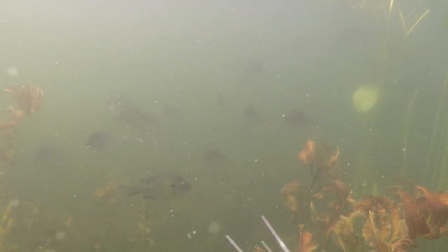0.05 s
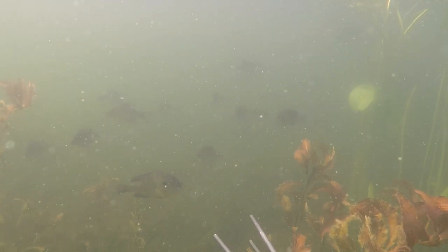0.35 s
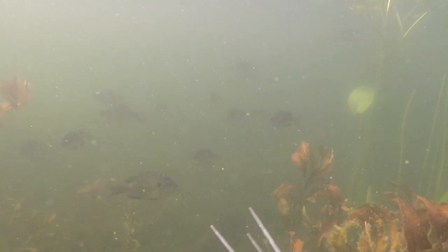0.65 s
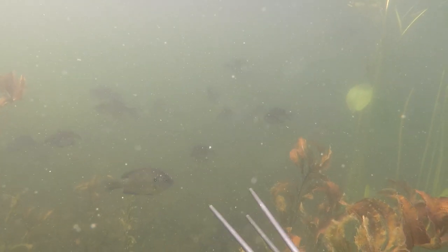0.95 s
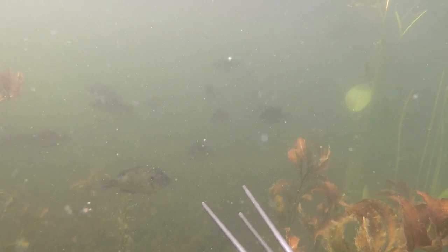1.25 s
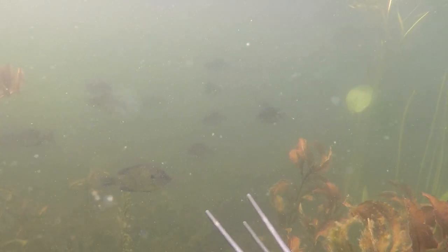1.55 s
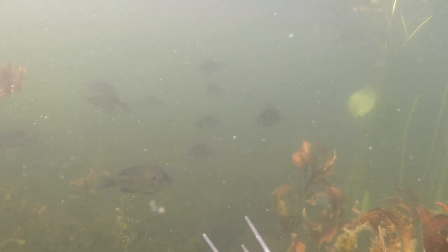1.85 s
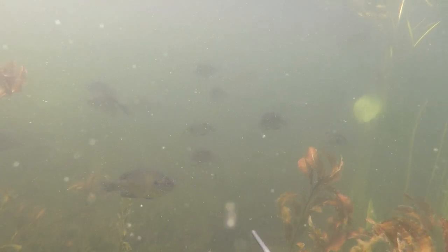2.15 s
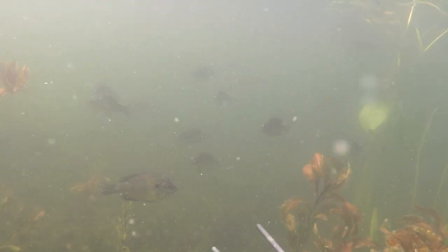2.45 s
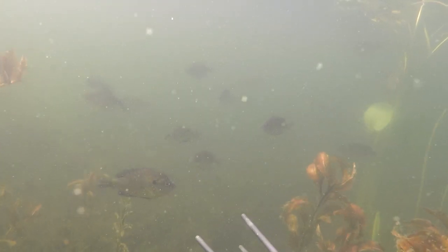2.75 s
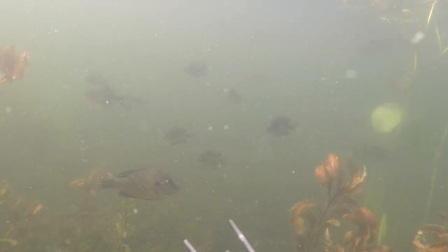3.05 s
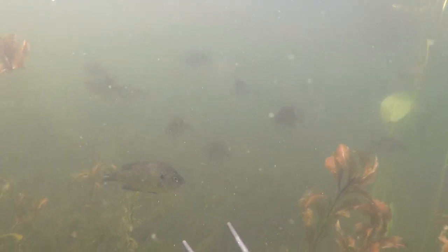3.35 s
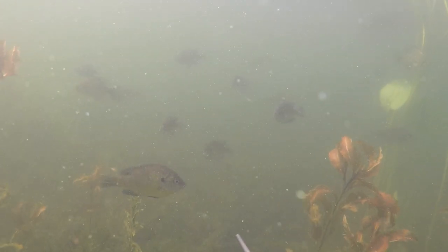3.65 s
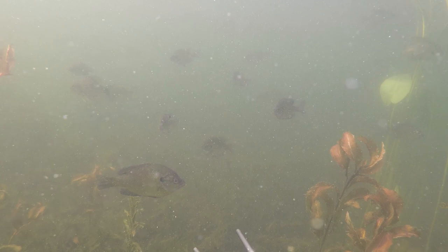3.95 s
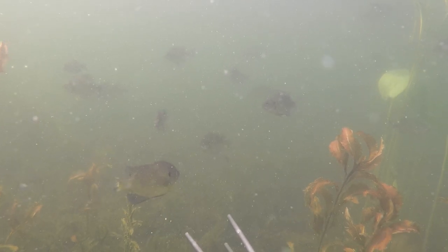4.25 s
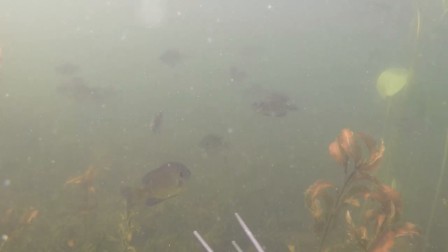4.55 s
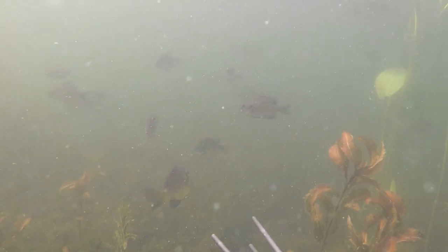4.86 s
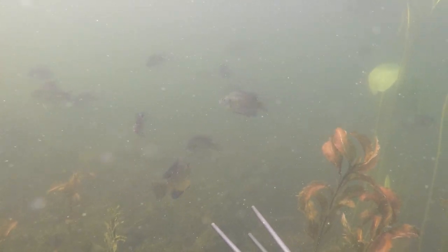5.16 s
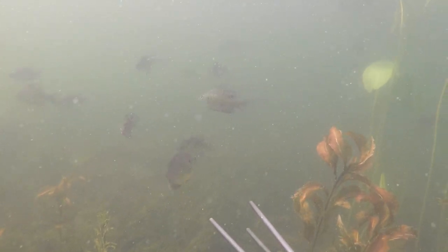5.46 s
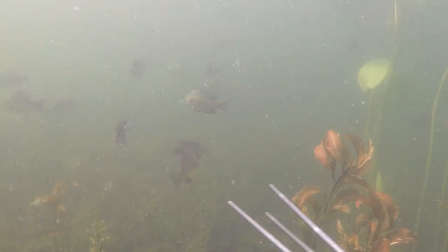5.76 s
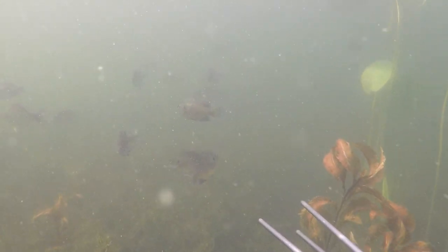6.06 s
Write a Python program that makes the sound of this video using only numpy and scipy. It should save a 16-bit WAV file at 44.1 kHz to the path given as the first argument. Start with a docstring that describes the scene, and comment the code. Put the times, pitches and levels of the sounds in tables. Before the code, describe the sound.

Muffled underwater bubbling in a pond swells into a gurgling gush, ends in one loud glug, then thins to stray plips.

```python
"""A gush of air gurgles up through a pond, past a camera held under the surface in a waterproof case.
Large pockets thump the case and small bubbles ring; the gush thins into single bubbles and ends in
one loud glug, then only stray plips. Specks tick against the case and water rumbles on it, over a
faint hiss. Its walls colour the sound and reach the two microphones differently."""
import sys
import numpy as np
from scipy import signal
from scipy.fft import rfft, irfft, next_fast_len
from scipy.io import wavfile
from scipy.ndimage import uniform_filter1d, minimum_filter1d

SR = 44100
rng = np.random.default_rng(int(sys.argv[2]) if len(sys.argv) > 2 else 0)


def master(y):
    """Save y as 16-bit WAV."""
    cut = np.clip(np.atleast_2d(y).T, -1, 1)
    pcm = np.round(cut * 32767)  # scale
    wavfile.write(sys.argv[1], SR, pcm.astype(np.int16))


N = 278271
TIME = np.arange(N) / SR
FFT_SIZE = 2 * next_fast_len(N // 2 + 8000)
BIN_HZ = np.fft.rfftfreq(FFT_SIZE, 1 / SR)
STRAY_DB = -42.5  # a few small bubbles are always about


def gush(level_db=-1, throb_db=1.26):
    """Air tears into many pockets a second, each a push on the case."""
    # the weight of large bubbles in the gush: (frequency [Hz], gain [dB])
    tone = [(100, -2), (150, -3), (190, 8.5), (250, 9), (330, 9.5), (420, -2), (600, 2), (1000, -8),
            (1900, -3), (2800, -11), (4500, -12)]
    churn = colour(patter(per_s=1600, spread_db=0.76), case_db() + over_bins(tone))
    throb = gain_of(throb_db * wander(rate_hz=26))
    return unit_rms(churn * throb) * gain_of(level_db) * airflow()


def airflow(attack_s=0.07, release_s=0.21):
    """Strength of the escaping air: every surge has an attack, a steady slope and a release."""
    # surges of air: (start [s], length [s], level [dB], fade [dB/s])
    surges = [(1.39, 1.18, -16.5, 12.5), (2.908, 0.9, -31, 4.5), (3.148, 0.047, -35.5, -4),
              (5.375, 0.06, -42, 17), (6.035, 0.32, -49.5, 14), (6.256, .06, -42, 4)]
    out = np.zeros(N)
    for start, length, db, fade_db_per_s in surges:
        t = np.maximum(TIME - start, 0)
        attack = np.minimum(t / attack_s, 1)
        release = np.exp(-np.maximum(t - length, 0) / release_s)
        out += attack * release * gain_of(db - fade_db_per_s * t)
    return out


def glugs(level_db=-1, wall_hz=312, wall_db=-10):
    """Large bubbles swell over a few cycles and shake a low mode of the case with them."""
    # big pockets of air that thump the case: (time [s], level [dB], pitch [Hz], t60 [s])
    pockets = [(0.569, -26.5, 195, 0.081), (0.634, -20, 240, 0.042), (0.664, -16.5, 217.6, 0.045),
               (1.425, -7, 218, 0.074), (1.4482, 6, 230.4, 0.043), (1.533, -20.5, 225, 0.053),
               (1.561, -0.5, 205, 0.03), (1.584, -10.5, 226, 0.045), (1.605, -9, 230, 0.02),
               (1.683, -12.5, 216, .05), (1.744, -18.5, 244, 0.091), (1.787, -13.5, 233, 0.086),
               (1.886, -16, 213, .05), (2.058, -10.5, 236, 0.055), (2.309, -24, 210, 0.037),
               (3.243, -11.5, 210, 0.054), (3.308, -33, 179, 0.15), (3.7871, -15.5, 190, 0.14),
               (3.858, -12, 200, 0.03), (5.434, -27.5, 209, 0.073), (5.586, -33.5, 187, 0.072)]
    # water shoved against the case by big pockets: (time [s], level [dB], pitch [Hz], t60 [s])
    shoves = [(1.562, -25.5, 50.2, 0.15), (3.258, -20, 23.3, 0.38), (3.785, -28.5, 35, 0.19),
              (3.917, -18.5, 55.3, 0.028)]
    out = np.zeros(N)
    wall = gain_of(wall_db) * ring(wall_hz, t60=0.1, rise_s=0.0026, sag=0.19, settle_s=0.0042)
    for s, db, hz, t60 in pockets:
        body = ring(hz, t60, rise_s=0.009, sag=0.12, settle_s=0.031)
        add(out, s, gain_of(db + level_db) * (body + wall))
    for s, db, hz, t60 in shoves:
        add(out, s, gain_of(db) * ring(hz, t60, rise_s=0.01, sag=0.13, settle_s=0.037))
    return out


def last_glug(at_s=3.9152):
    """The gush's last pocket strikes the case: high modes speak at once, low ones swell into a plop."""
    # modes of the struck case: (pitch [Hz], level [dB], t60 [s], rise [s])
    modes = [(202.5, -7, 0.07, 0.023), (231.5, 4.5, 0.027, 0.033), (314.6, 1, 0.034, 0.025),
             (390, -8.5, 0.084, 0.0027), (585, -1.5, 0.0094, 0.0022), (725, -22, 0.035, 0.0052),
             (1296, -28, 0.029, .003), (1960, -28, 0.019, 0.0055), (2260, -40, 0.023, .004),
             (2800, -54, .018, .004)]
    out = np.zeros(N)
    for hz, db, t60, rise_s in modes:
        add(out, at_s, gain_of(db) * ring(hz, t60, rise_s))
    return out


def bubbles(level_db=0.5, click_db=-4, shard_db=-14, shard_s=0.018, shard_hz=860, shard_span_hz=380):
    """Each bubble clicks the case as it pinches off, then rings; in a crowd its neighbours jostle it."""
    # bubbles that stand out of the swarm: (time [s], level [dB], pitch [Hz], t60 [s])
    plips = [(.226, -23.5, 744, 0.024), (0.4351, -23.5, 717, 0.039), (0.537, -23.5, 956, 0.047),
             (.568, -20.5, 758, 0.06), (.579, -23.5, 950, 0.0203), (.745, -29.5, 696, .035),
             (.83, -28.5, 670, 0.032), (0.972, -19, 840, 0.018), (0.979, -26.5, 1180, 0.014),
             (1.146, -24, 1127, 0.025), (1.15, -29, 903, 0.06), (1.204, -29, 710, 0.036),
             (1.279, -42, 790, 0.023), (1.359, -27, 735, 0.031), (1.37, -21, 763, 0.11),
             (1.404, -16, 690, 0.041), (1.4442, -7.5, 532, 0.049), (1.503, -15.5, 1023, 0.09),
             (1.503, -20, 566, .04), (1.556, -14, 630, 0.045), (1.557, -17.5, 1026, .05),
             (1.659, -25, 564, 0.033), (1.66, -15.5, 787, 0.089), (1.7064, -9, 737, 0.11),
             (1.773, -17.5, 468, 0.11), (1.786, -16, 805, 0.043), (1.788, -22.5, 1040, 0.033),
             (1.8265, -14.5, 676, 0.023), (1.843, -19, 782, 0.22), (1.866, -19, 923, .05),
             (1.872, -11, 770, 0.037), (1.877, -20.5, 1247, 0.058), (1.883, -10, 950, 0.023),
             (1.919, -24, 1160, .05), (2.044, -25.5, 1150, 0.15), (2.094, -24, 876, 0.16),
             (2.175, -22.5, 777, 0.051), (2.283, -23, 990, 0.075), (2.296, -15, 905, 0.064),
             (2.3425, -14, 1077, 0.11), (2.3442, -3.5, 927, 0.042), (2.356, -10, 825, 0.06),
             (2.3726, -15, 960, 0.066), (2.413, -14.5, 900, 0.084), (2.463, -27, 1114, 0.15),
             (2.478, -17.5, 887, 0.033), (2.488, -21, 1197, 0.037), (2.535, -32, 1464, 0.062),
             (2.555, -15.5, 878, 0.043), (2.612, -11, 990, 0.045), (2.625, -26, 1504, 0.015),
             (2.6208, -8.5, 968, 0.046), (2.6593, -15.5, 1122, 0.096), (2.658, -22, 958, 0.089),
             (2.677, -15, 934, 0.14), (2.687, -24.5, 1130, .06), (2.719, -34, 1170, 0.046),
             (2.714, -17, 915, 0.094), (2.756, -15.5, 950, 0.057), (2.771, -26, 1202, 0.13),
             (2.791, -13.5, 944, 0.033), (2.792, -24.5, 1200, 0.041), (2.8305, -24.5, 1260, 0.024),
             (2.8465, -20, 1133, 0.042), (2.867, -17, 970, 0.06), (2.867, -23, 1140, .05),
             (2.918, -34, 1274, 0.046), (3.068, -15, 900, 0.033), (3.156, -2.5, 1180, 0.05),
             (3.157, -9, 985, 0.035), (3.1622, -7, 1223, 0.055), (3.174, -14.5, 716, 0.014),
             (3.22, -28, 927, 0.1), (3.248, -29, 1390, .04), (3.258, -22, 1030, 0.045),
             (3.259, -15, 1183, 0.073), (3.331, -25, 1270, 0.051), (3.43, -27, 1320, 0.015),
             (5.061, -42.5, 1860, 0.047), (5.064, -23, 800, 0.13), (5.07, -37, 920, 0.037),
             (5.437, -44.5, 1420, 0.12), (5.45, -24, 1025, 0.016), (5.453, -22.5, 860, 0.11),
             (5.474, -23, 614, 0.012), (5.609, -29.5, 1470, 0.024), (5.6679, -13.5, 738, 0.037),
             (5.881, -21, 905, 0.017), (6.058, -20.5, 1030, 0.026), (6.06, -20, 900, 0.061),
             (6.06, -36, 1720, 0.023), (6.113, -19.5, 680, 0.0094)]
    tones, clicks = np.zeros(N), np.zeros(N)
    crowd = crowding() + gain_of(STRAY_DB)
    crowd = np.sqrt(crowd / crowd.max())
    for (s, db, hz, t60), shards in zip(plips, rng.random((len(plips), 3, 2))):
        add(tones, s, gain_of(db + level_db) * ring(hz, t60, rise_s=0.0017, sag=0.018, settle_s=0.0083))
        add(clicks, s, gain_of([db + click_db]))
        # it sheds small bubbles that beat against it, louder in crowded water
        shard_gain = gain_of(db + shard_db) * crowd[round(s * SR)]
        for late, small in shards:
            pitch = shard_hz + shard_span_hz * small
            shard = ring(pitch, t60=0.027, rise_s=0.0026, sag=0.037, settle_s=0.0027)
            add(tones, s + shard_s * late, shard_gain * shard)
    jostle = 1 + 0.22 * crowd * wander(rate_hz=170)
    return tones * jostle + knock(clicks)


def swarm(level_db=-3, spread_octaves=0.32, cycles=30):
    """Small bubbles scattered about a typical size, each dying away over the same number of cycles."""
    # bubbles get smaller as the gush thins out: (time [s], typical pitch [Hz])
    sizes = [(2.0, 805), (2.4, 955), (3.3, 1120), (3.8, 825)]
    out, typical_hz = np.zeros(N), over_time(sizes)
    for hz in np.geomspace(580, 1330, 20):
        plip = ring(hz, t60=cycles / hz, rise_s=0.0014, sag=0.056, settle_s=0.0012)
        share = np.exp(-.5 * (np.log2(hz / typical_hz) / spread_octaves) ** 2)
        out += signal.oaconvolve(share * patter(per_s=28, spread_db=4.5), plip)[:N]
    return unit_rms(out) * gain_of(level_db) * (crowding() + gain_of(STRAY_DB))


def crowding():
    """Strength of the small bubbles drifting past."""
    # clouds of bubbles that swell and pass: (middle [s], half width [s], level [dB])
    clouds = [(1.701, 1, -51.5), (2.6, 0.51, -32), (3.238, 0.059, -34.5)]
    return swells(clouds)


def pings(level_db=4):
    """Tiny bubbles ring high and briefly; the shortest are dry ticks."""
    # tiny bubbles close to the case: (time [s], level [dB], pitch [Hz], t60 [s])
    tiny_bubbles = [(1.405, -42, 1960, .03), (1.582, -51, 3230, .009), (1.731, -53, 3450, .008),
                    (2.0732, -44.5, 2750, .012), (2.143, -52, 2640, .012), (2.292, -53, 2880, 0.024),
                    (2.344, -37.5, 2630, 0.031), (2.5262, -57, 2970, .02), (2.5673, -42, 2700, 0.036),
                    (2.818, -46.5, 2770, 0.027), (2.873, -43, 1910, .03), (3.157, -41.5, 3210, 0.016),
                    (3.9629, -58.5, 3080, .02), (6.0596, -55, 3040, .028)]
    out = np.zeros(N)
    for s, db, hz, t60 in tiny_bubbles:
        add(out, s, gain_of(db + level_db) * ring(hz, t60, rise_s=0.00081, sag=0.046, settle_s=0.0028))
    return out


def sparkle(cloud_db=-30):
    """The finest bubbles fizz in each puff of froth, and faintly above each cloud."""
    # puffs of froth where the air tears open: (middle [s], half width [s], level [dB])
    froth = [(1.51, .085, -52), (2.497, .016, -52)]
    fizz = np.zeros(N)
    for hz in np.geomspace(1900, 2950, 14):
        ping = ring(hz, t60=0.01, rise_s=0.0012, sag=.03, settle_s=.0016)
        fizz += signal.oaconvolve(patter(per_s=720, spread_db=0.5), ping)[:N] / hz
    return unit_rms(fizz) * (gain_of(cloud_db) * crowding() + swells(froth))


def ticks(knock_db=-3, scrape_s=0.01, scrape_db=-7):
    """Drifting specks snap against the case and scrape along it for a moment."""
    # specks hitting the case: (time [s], dull knock [dB], bright snap [dB], snap pitch [Hz])
    specks = [(0.357, -17.5, -55, 1300), (0.51, -7.5, -47, 1900), (0.574, -7, -35, 1380),
              (0.581, -13, -44, 1490), (0.627, -9.5, -46, 1900), (0.6447, -4, -46, 1600),
              (.653, -9, -52, 1900), (0.8751, -7.5, -51.5, 3700), (0.8772, -16.5, -55, 5070),
              (0.972, -3.5, -33, 1810), (0.977, -11, -43, 1760), (1.277, -7.5, -48, 1840),
              (1.361, -5.5, -51.5, 2500), (1.565, -4.5, -48.5, 3520), (1.568, -11, -53, 5600),
              (2.37, -13, -63, 4400), (2.49, -2, -42, 2390), (2.502, -4.5, -51, 3930),
              (2.682, -14, -55, 5000), (2.716, -5.5, -52, 3050), (3.046, -13.5, -30, 1450),
              (3.429, -6.5, -42, 1460), (3.785, -6, -57, 1870), (3.794, -9.5, -55, 5070),
              (3.848, -4, -55, 3400)]
    clicks, snaps = np.zeros(N), np.zeros(N)
    for (s, db, snap_db, hz), scrapes in zip(specks, rng.random((len(specks), 4))):
        add(clicks, s, gain_of([db]))
        add(snaps, s, gain_of(snap_db) * ring(hz, t60=0.012, rise_s=0.0011, sag=.03, settle_s=0.0016))
        for k, late in enumerate(scrapes):
            add(clicks, s + scrape_s * late, (-1) ** k * gain_of([db + scrape_db]))
    return gain_of(knock_db) * knock(clicks) + snaps


def wash(level_db=-45, lap_db=1.5):
    """The far fizz and lapping of the pond, heard through the case."""
    # far water, full in the low mids: (frequency [Hz], gain [dB])
    tone = [(150, -3), (220, 3.5), (300, 1.5), (450, 4), (700, -4.5), (1200, -0.5), (3000, 1.5)]
    fizz = colour(patter(per_s=2500, spread_db=5.0), case_db() + over_bins(tone))
    lapping = gain_of(lap_db * wander(rate_hz=23))
    return gain_of(level_db) * unit_rms(fizz * lapping)


def rumble(level_db=2, side_db=-14):
    """Slow water pressure on the case, nearly alike on both sides."""
    # the deep tone of that pressure: (frequency [Hz], gain [dB])
    tone = [(8, -7), (26, 2.5), (50, -7), (90, -9.5), (130, -17), (220, -40), (450, -40), (1000, -77.5)]
    # how hard the water pushes: (time [s], level [dB])
    flow = [(0.0, -30), (0.35, -30.5), (1.5, -37), (2.43, -35), (2.56, -40.5), (3.15, -37), (3.25, -30.5),
            (3.5, -35.5), (3.72, -43), (4.06, -43.5), (5.0, -51), (5.46, -50.5), (6.31, -61)]
    mid, side = noise(tone), gain_of(side_db) * noise(tone)
    return np.array([mid + side, mid - side]) * gain_of(over_time(flow) + level_db)


def hiss(left_db=-59.0, right_db=-57.5):
    """A faint, wide hiss, independent on each side."""
    # the bright tone of the hiss: (frequency [Hz], gain [dB])
    tone = [(100, -10), (2000, 9.5), (3000, 6), (4500, 2.5), (7000, 4.5), (9500, 4), (11000, 0.5),
            (13000, -5.5), (15000, -23.5)]
    return np.array([gain_of(left_db) * noise(tone), gain_of(right_db) * noise(tone)])


def dull_bed(level_db=-52):
    """A muffled mono noise floor."""
    # its bass-heavy tone: (frequency [Hz], gain [dB])
    tone = [(40, 18.5), (200, 28.5), (450, 16.5), (1000, 10.5), (2000, 5), (3400, -8.5), (5000, -1),
            (7300, -2), (9200, 5.5), (11000, -1), (13000, -6.5), (15000, -14)]
    return gain_of(level_db) * noise(tone)


def narrowing():
    """Crossfade of the background from wide (0) to dull mono (1) and back."""
    # timing of the crossfade: (start [s], closing [s], holding [s], opening [s])
    stages = (3.347, 0.65, 0.7, 0.64)
    return np.interp(TIME, np.cumsum(stages), [0, 1, 1, 0])


def case_db():
    """Gain of the case at every bin: it muffles the treble and its walls resonate."""
    # how the case passes sound: (frequency [Hz], gain [dB])
    response = [(60, -30.5), (130, 2), (200, 3.5), (290, -6), (450, -9), (570, -5.5), (760, -0.5),
                (1000, -7), (1300, -10), (1540, -12), (1950, -18), (2300, -26.5), (3300, -37.5),
                (6000, -52)]
    # resonances of its walls: (frequency [Hz], width [Hz], lift [dB])
    walls = [(327, 25, 2), (542, 72, 5.5), (1070, 340, 7.5), (1552, 61, 2), (1940, 99, 4.5)]
    lift_db = sum(db / (1 + (2 * (BIN_HZ - hz) / width) ** 2) for hz, width, db in walls)
    return over_bins(response) + lift_db


def knock(clicks):
    """Clicks heard through the case, with their energy kept."""
    knocks = colour(clicks, case_db())
    return knocks * np.linalg.norm(clicks) / np.linalg.norm(knocks)


def two_microphones(x):
    """Above the lowest mode the case walls swing against each other, so the sides are out of step."""
    # the left microphone against the right: (frequency [Hz], level [dB], phase lead [rad])
    balance = [(60, 0, 0), (130, 3.4, 0), (260, 4, -.4), (350, -.5, -.8), (420, -7, -.5), (455, -12, .6),
               (500, -4.5, 1.7), (570, -1.8, 1.8), (690, 3, 2.5), (810, 11, 2.9), (900, 6.3, 3.2),
               (1220, 1.8, 3.85), (1480, -3.3, 4.1), (1560, -8, 3.1), (1660, -2.5, 1.8), (1760, 5, 2.5),
               (1920, 10, 3.5), (2150, 3.5, 3.3), (2450, 1, 4.1), (2730, 4, 4.6), (3200, 1, 6.3)]
    left_over_right_db, lead = over_bins(balance), over_bins(balance, column=2)
    left = colour(x, np.minimum(left_over_right_db, 0))  # only the weaker side is damped
    to_right = gain_of(-left_over_right_db) * np.exp(-1j * lead)
    right = irfft(rfft(left, FFT_SIZE) * to_right)[:N]
    return np.array([left, right])


def echoed(x, echo_db=-15, decay_s=.003):
    """Near surfaces throw a sound back."""
    t = TIME[:SR // 10]
    scatter = rng.standard_normal(len(t)) * t * np.exp(-t / decay_s)
    return x + gain_of(echo_db) * signal.oaconvolve(x, scatter / np.linalg.norm(scatter))[:N]


def ring(hz, t60, rise_s, sag=0, settle_s=1):
    """A bubble or mode swells and dies away; its pitch slides down through hz by the fraction sag."""
    t = np.arange(SR // 5) / SR
    envelope = (1 - np.exp(-2 * t / rise_s)) ** 2 * gain_of(-60 * t / max(t60, .005))
    pitch = hz * (1 + sag * (np.exp(-t / settle_s) - .5))
    return envelope / envelope.max() * np.sin(2 * np.pi * np.cumsum(pitch) / SR)


def patter(per_s, spread_db):
    """Clicks at random times, of either sign and uneven size."""
    draw, out = rng.random(N) * SR / per_s, np.zeros(N)
    at = np.flatnonzero(draw < 1)
    out[at] = (-1.) ** at * gain_of(spread_db * np.minimum(-np.log(draw[at]), 3))
    return out


def noise(tone):
    """Steady noise of rms 1 with the given spectrum."""
    return unit_rms(colour(rng.standard_normal(N), over_bins(tone)))


def wander(rate_hz):
    """Smooth random modulation of rms 1."""
    spectrum = rfft(rng.standard_normal(FFT_SIZE)) * np.exp(-(BIN_HZ / rate_hz) ** 2)
    return unit_rms(irfft(spectrum)[:N])


def swells(rows):
    """An envelope of bell-shaped swells."""
    return sum(gain_of(db) * np.exp(-((TIME - s) / width) ** 2) for s, width, db in rows)


def colour(x, db):
    """Minimum-phase EQ with the given gain per bin, so that clicks ring only afterwards."""
    cepstrum = irfft(db * np.log(10) / 20)
    cepstrum[1:FFT_SIZE // 2] *= 2
    cepstrum[FFT_SIZE // 2 + 1:] = 0
    return irfft(rfft(x, FFT_SIZE) * np.exp(rfft(cepstrum)))[:N]


def over_bins(points, column=1):
    """A table over frequency, read at every bin."""
    table = np.array(points, float)
    return np.interp(np.log(BIN_HZ + 1), np.log(table[:, 0] + 1), table[:, column])


def over_time(points):
    """A table over time, read at every sample."""
    return np.interp(TIME, *np.transpose(points))


def add(mix, s, sound):
    """Lays a sound into the mix at time s."""
    part = mix[max(round(s * SR), 0):][:len(sound)]
    part += sound[:len(part)]


def gain_of(db):
    """Decibels to amplitude."""
    return 10 ** (np.asarray(db) / 20)


def unit_rms(x):
    """Scales to rms 1."""
    return x / np.sqrt(np.mean(x ** 2) + 1e-20)


def scene():
    """Bubbles and background on two microphones; swarm, wash and hiss briefly yield to the dull bed."""
    mono = narrowing()
    wide = 1 - mono
    close = echoed(bubbles() + pings() + ticks())
    water = close + glugs() + last_glug() + gush() + sparkle() + wide * (swarm() + wash())
    return two_microphones(water) + wide * hiss() + rumble() + mono * dull_bed()


def record(dry, ceiling_db=-.7, recover_db_per_s=115, smooth_samples=130, cutoff_hz=15000):
    """A limiter catches the loudest glugs and pops, and the hiss ducks with them; then a low-pass."""
    # the limiter's sidechain, more sensitive above the bass: (frequency [Hz], gain [dB])
    sidechain_eq = [(300, 0), (900, 4)]
    sidechain = irfft(rfft(dry, FFT_SIZE) * gain_of(over_bins(sidechain_eq)))[:, :N]
    peak_db = 20 * np.log10(abs(sidechain).max(0) + 1e-9)
    fall_db = TIME * recover_db_per_s
    held_db = np.maximum.accumulate(peak_db + fall_db) - fall_db
    over_db = np.maximum(held_db - ceiling_db, 0)
    duck_db = uniform_filter1d(minimum_filter1d(-over_db, smooth_samples), smooth_samples)
    lowpass = signal.firwin(511, cutoff_hz, window=("kaiser", 9), fs=SR)
    return signal.oaconvolve(dry * gain_of(duck_db), lowpass[None], "same")


dry = scene()
out = record(dry)
master(out)
```